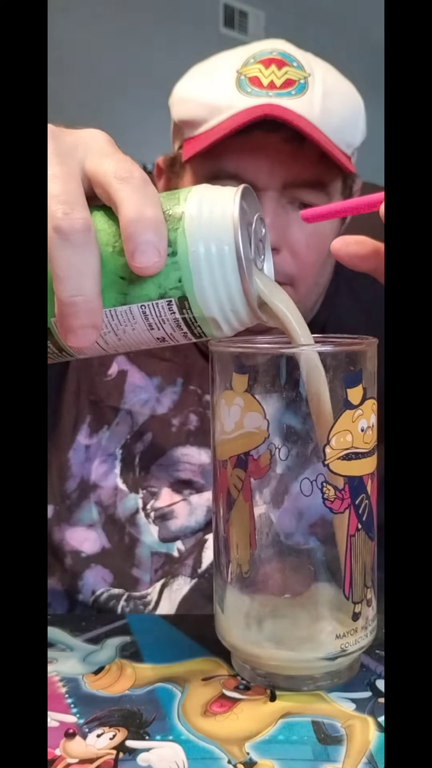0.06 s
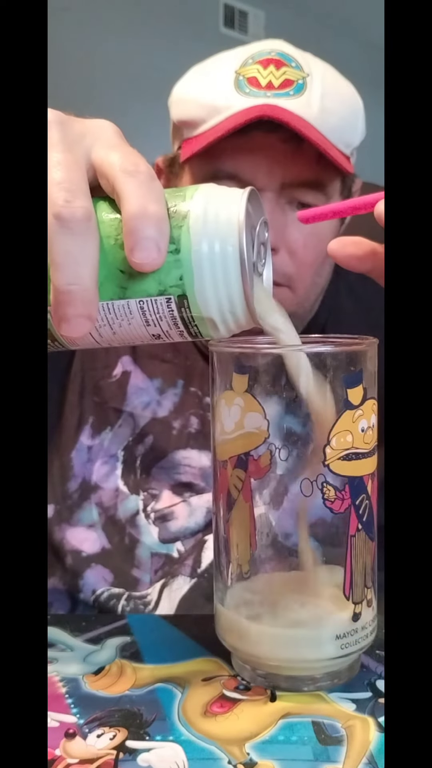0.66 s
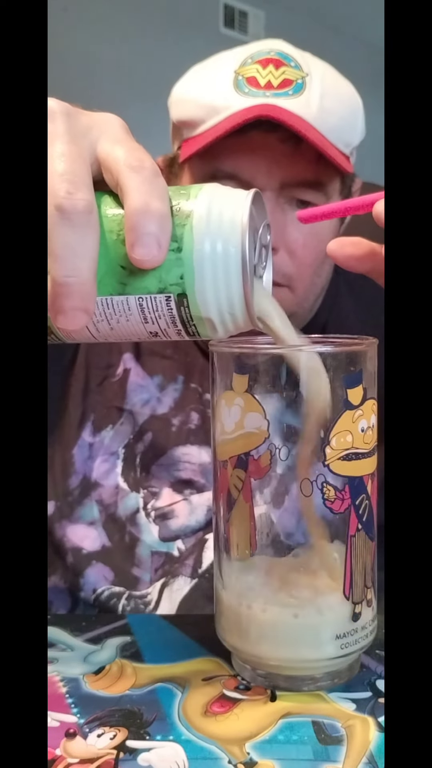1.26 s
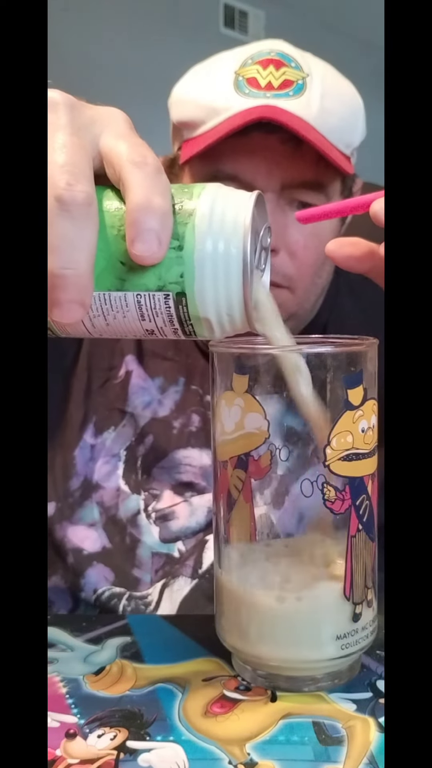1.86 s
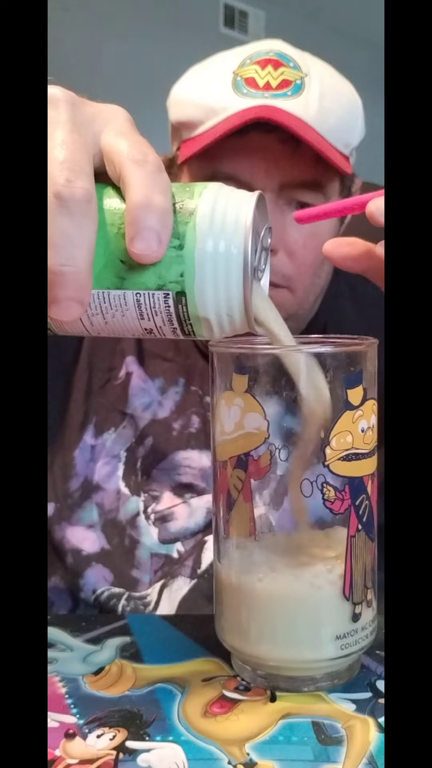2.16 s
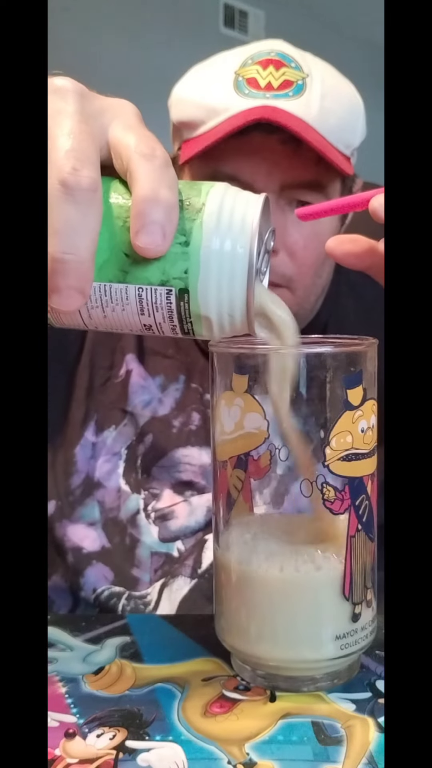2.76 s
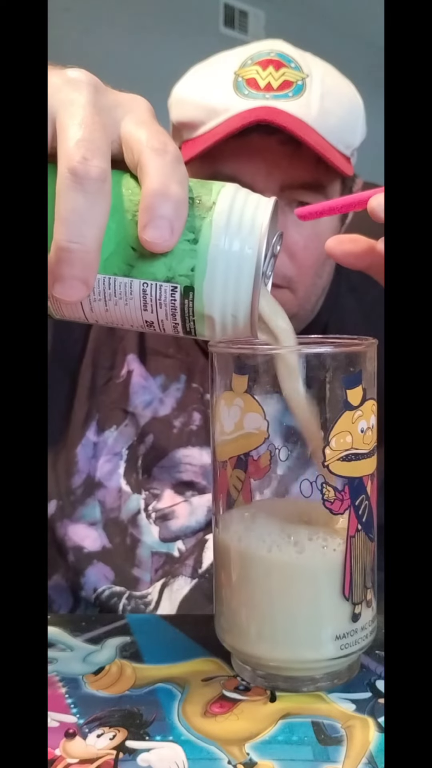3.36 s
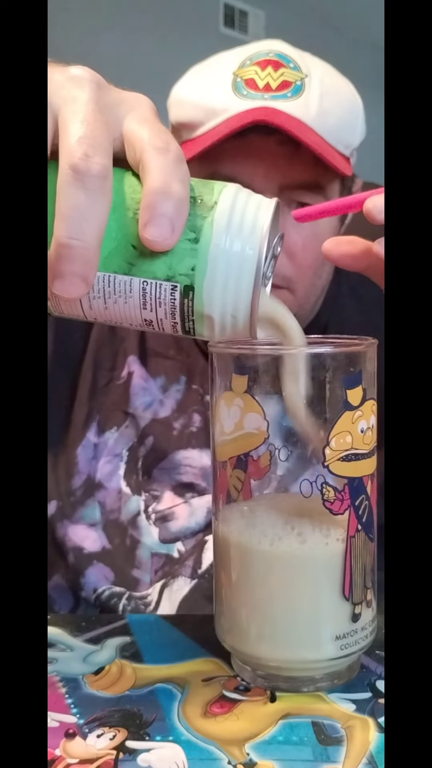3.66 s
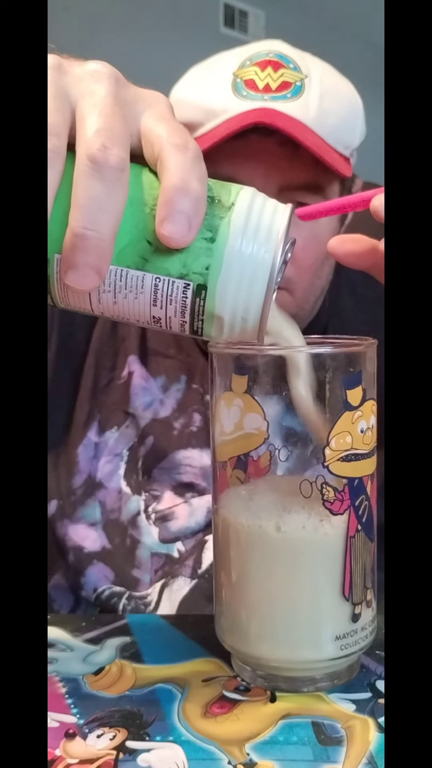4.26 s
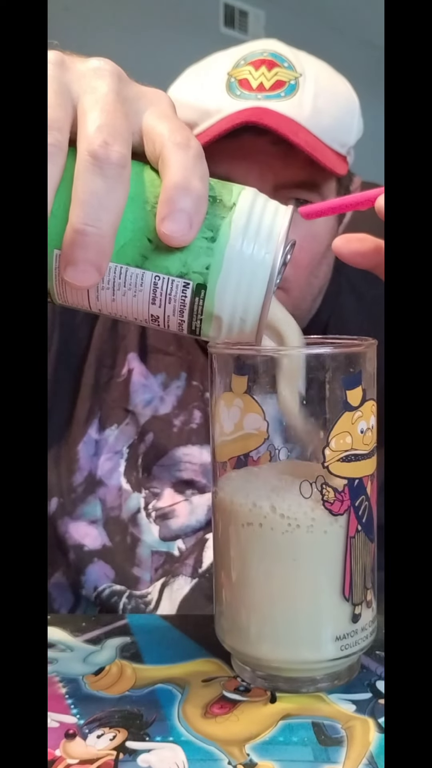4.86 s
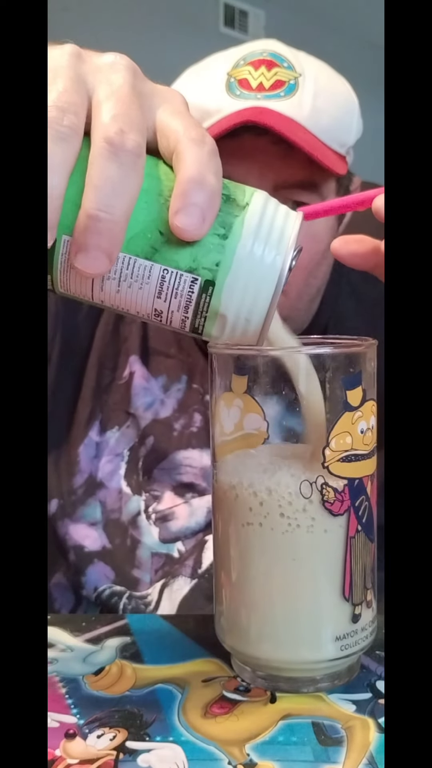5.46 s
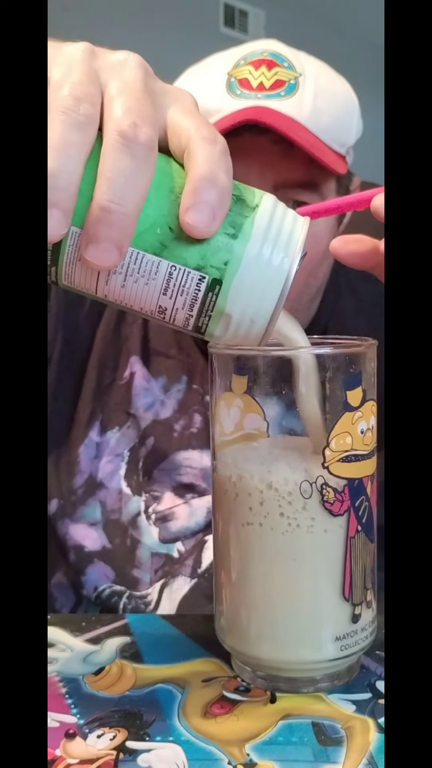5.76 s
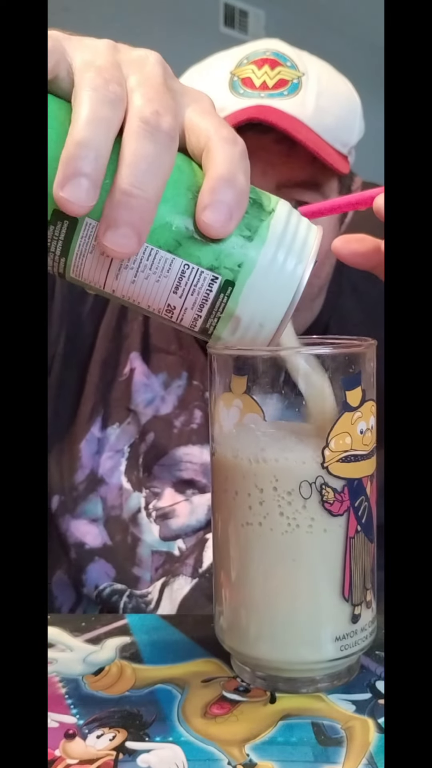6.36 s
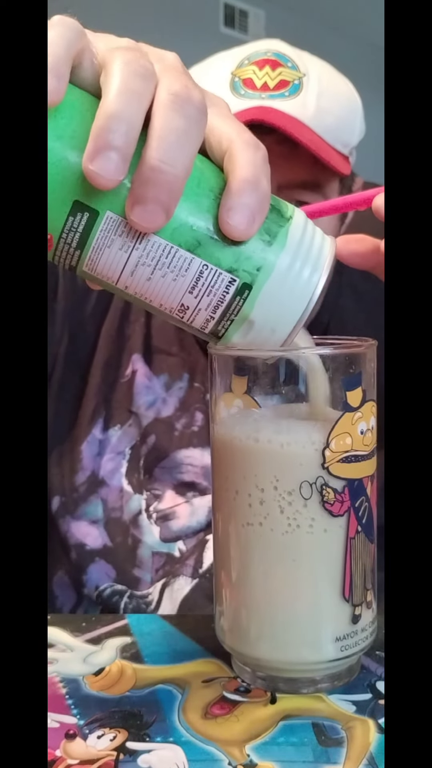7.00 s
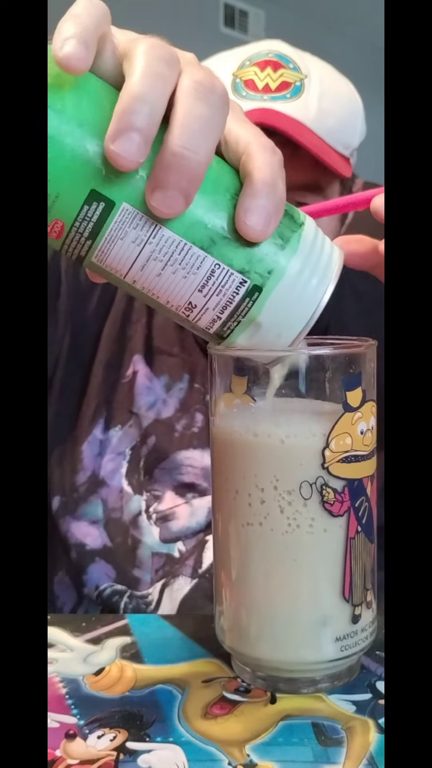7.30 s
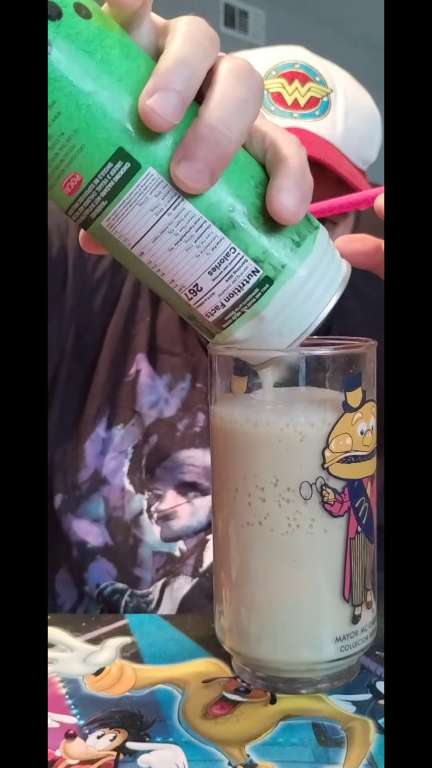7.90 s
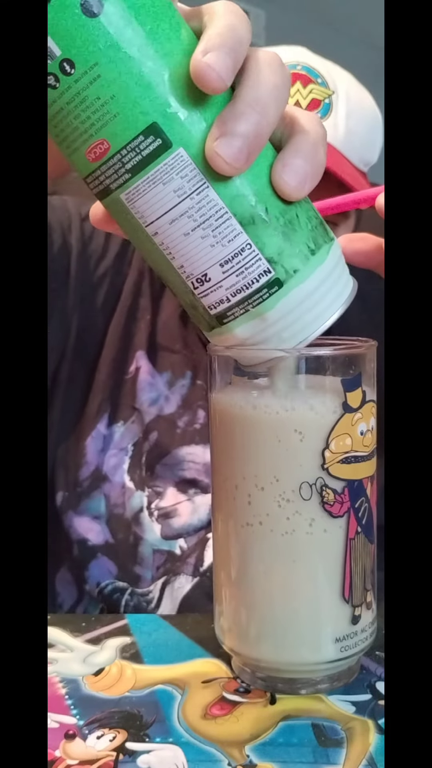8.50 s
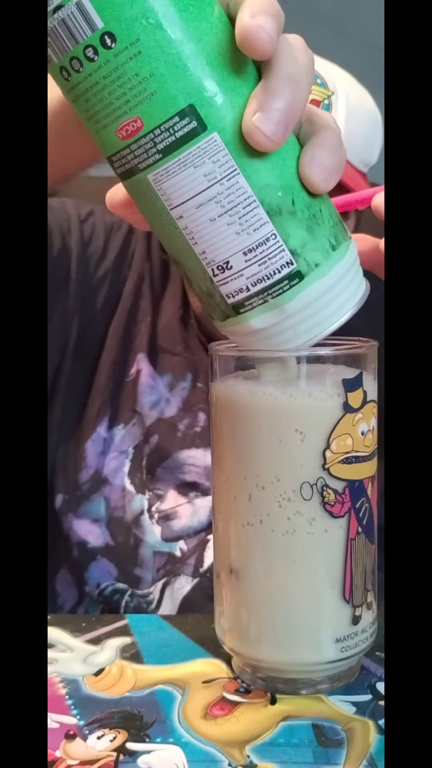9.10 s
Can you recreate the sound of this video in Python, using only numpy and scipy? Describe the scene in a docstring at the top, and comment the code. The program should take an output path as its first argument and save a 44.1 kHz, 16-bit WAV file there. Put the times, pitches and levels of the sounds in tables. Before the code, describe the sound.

A thick, foaming drink glugs and fizzes into a tall glass, rising in pitch, thinning to a trickle, then the can taps the rim.

```python
"""A thick, foaming drink is poured from a can into a tall glass, close to a phone in a small room.
The uneven stream traps big bubbles that glug in the air column above the liquid, whose pitch rises
as the glass fills. Small bubbles ping and spray crackles; the growing foam muffles the pour until
only a trickle is left. Near the end the can taps the rim. The room rumbles and hums faintly."""
import sys
import numpy as np
from scipy import signal
from scipy.fft import rfft, irfft, next_fast_len
from scipy.io import wavfile

SR = 44100
rng = np.random.default_rng(int(sys.argv[2]) if len(sys.argv) > 2 else 0)


def store_wav(level_fs):
    """Save 16-bit WAV to argv[1]."""
    pcm = np.round(np.clip(np.atleast_2d(level_fs), -1, 1) * 32767)
    wavfile.write(sys.argv[1], SR, pcm.T.astype(np.int16))


N = 403074
TOP_HZ = 15800


def amp(db):
    """Decibels to gain."""
    return 10 ** (np.asarray(db) / 20)


def unit(x):
    """Scale to rms 1."""
    return x / np.sqrt(np.mean(x ** 2) + 1e-20)


def along(points, hz):
    """(frequency [Hz], value) points read on a log axis."""
    knots_hz, values = np.transpose(points)
    return np.interp(np.log(hz + 1), np.log(knots_hz + 1), values)


def at(rows, time_s, column):
    """One column of a time table, read at time_s."""
    table = np.transpose(rows)
    return np.interp(time_s, table[0], table[column])


def curves(rows):
    """One value per sample for each column after the time."""
    return [at(rows, np.arange(N) / SR, column) for column in range(1, len(rows[0]))]


def wobble(rate_hz):
    """A random curve with rate_hz knots a second."""
    knots = rng.standard_normal(int(N * rate_hz / SR) + 2)
    return np.interp(np.arange(N) * rate_hz / SR, np.arange(len(knots)), knots)


def filtered(x, response):
    """x times a response of frequency."""
    size = next_fast_len(N + SR // 4)
    return irfft(rfft(x, size) * response(np.fft.rfftfreq(size, 1 / SR)), size)[..., :N]


def coloured(x, points):
    """x shaped by a (frequency [Hz], gain [dB]) spectrum."""
    return filtered(x, lambda hz: amp(along(points, hz)))


def add(track, time_s, sound):
    """Mix a sound into a track."""
    start = int(np.clip(round(time_s * SR), 0, N - 1))
    track[start:start + len(sound)] += sound[:N - start]


def resonate(x, hz, width_hz):
    """A resonance of gain 1 whose pitch may move."""
    angle = (2 * np.pi * (np.cumsum(hz) / SR % 1)).astype(np.float32)
    carrier = np.cos(angle) + 1j * np.sin(angle)
    pole = np.exp(-np.pi * width_hz / SR)
    return 2 * np.real(carrier * signal.lfilter([1 - pole], [1, -pole], x * carrier.conj()))


def patter(shape, grain):
    """Noise of countless droplets, spikier with more grain; rms 1."""
    return unit(rng.standard_normal(shape) * np.exp(grain * np.minimum(rng.standard_normal(shape), 2)))


def burst(t, t60_s, grain):
    """Grainy noise under a quick decay."""
    return patter(len(t), grain) * amp(-60 * t / t60_s)


def hum(centre_hz, width_hz):
    """A narrow noise band, heard as a wavering tone; rms 1."""
    return unit(filtered(rng.standard_normal(N), lambda hz: 1 / (1 + ((hz - centre_hz) / width_hz) ** 2)))


# Room air and rumble spectra: (frequency [Hz], gain [dB])
AIR_SPECTRUM = [(15, -39), (25, -53), (71, -13), (340, -3.5), (399, -5.5), (457, -10.5), (537, -6),
                (598, -17), (826, -21), (2420, -32), (2920, -21), (4040, -35.5), (9050, -31), (14300, -33),
                (15500, -60)]
RUMBLE_SPECTRUM = [(25, -37), (45, -24), (58, -0.5), (75, 0.5), (95, -1.5), (125, -5.5), (175, -9.5),
                   (300, -18.5), (600, -52)]
# Room bass: (time [s], rumble level [dB], drone level [dB])
BASS_LEVELS = [(0.0, -72.5, -76), (1.42, -61, -68), (4.18, -67.5, -80), (5.7, -66.5, -83), (5.98, -61, -68),
               (9.01, -62.5, -60), (9.14, -59.5, -81)]


def background(air_db=-67, rumble_trim_db=-1, drone_trim_db=-3, hum_db=-72):
    """Room air, a low rumble and drone that come and go, and a faint wavering hum."""
    mid, side = rng.standard_normal((2, N))
    side = coloured(side, [(200, -20.5), (600, -4), (2000, -2)])
    air = unit(coloured(np.array([mid + side, mid - side]), AIR_SPECTRUM))
    rumble_db, drone_db = curves(BASS_LEVELS)
    rumble = unit(coloured(rng.standard_normal(N) + 0.3 * rng.standard_normal((2, N)), RUMBLE_SPECTRUM))
    drone = amp(drone_db + drone_trim_db) * hum(centre_hz=145, width_hz=7.5)
    faint_hum = amp(hum_db) * hum(centre_hz=398, width_hz=6.5)
    return amp(air_db) * air + amp(rumble_db + rumble_trim_db) * rumble + drone + faint_hum


# Wall decay: (frequency [Hz], t60 [s])
WALL_DECAY = [(150, 0.056), (600, 0.17), (2500, 0.11), (6000, 0.084), (14000, 0.056)]


def room(x, walls_db=-9, near_db=-11, near_t60_s=0.13, onset_s=0.0025):
    """Nearby things echo at once, the walls with a short tail; both change as the splash moves about."""
    wet = np.zeros((2, N))
    block = SR // 2
    for start in range(0, N, block):
        hz, frame_s, noise = signal.stft(rng.standard_normal((2, SR // 4)), SR, nperseg=256)
        decay = amp(-60 * frame_s / along(WALL_DECAY, hz)[:, None])
        tails = signal.istft(noise * decay, SR, nperseg=256)[1]
        t = np.arange(tails.shape[1]) / SR
        tails *= 1 - np.exp(-t / onset_s)
        for port, tail in zip(wet, tails):
            near = burst(t, near_t60_s, grain=0.87)
            echoes = amp(walls_db) * tail / np.linalg.norm(tail)
            echoes += amp(near_db) * near / np.linalg.norm(near)
            add(port, start / SR, signal.fftconvolve(x[start:start + block], echoes))
    return wet


# Microphone port colour: (frequency [Hz], left minus right [dB])
PORT_BALANCE = [(200, -2), (420, -1), (650, -5), (820, -4.5), (1100, 1.5), (2400, 0), (3200, -3),
                (5600, -7.5), (7000, -1), (8400, 6.5), (10000, 25.5), (14000, 7)]


def port_gains(hz):
    """Left and right port gains at constant total power."""
    left = amp(along(PORT_BALANCE, hz))
    return np.array([left, np.ones_like(left)]) * np.sqrt(2 / (1 + left ** 2))


# Can on rim: (time [s], ring level [dB], tick level [dB])
RIM_TAPS = [(7.776, -64, -38), (8.108, -51, -67), (8.121, -41, -44.5)]
# Full glass: (frequency [Hz], level [dB], t60 [s])
GLASS_MODES = [(2950, -26.5, 5.0), (3612, -0.5, 0.17), (3840, -8, 0.31), (5943, -12.5, 0.19),
               (6100, -21, 1.3), (7391, -43, 5.0)]
# Contact tick: (frequency [Hz], gain [dB])
TICK_SPECTRUM = [(900, -3), (1900, 7.5), (3000, 10), (5200, 0.5), (7000, -12), (10000, -13), (15000, -36)]


def taps(ring_db=-3):
    """The can's lip touches the rim: a dry tick and a short ring of the full glass."""
    t = np.arange(SR // 4) / SR
    ring = sum(amp(db - 60 * t / t60_s) * np.sin(2 * np.pi * hz * t) for hz, db, t60_s in GLASS_MODES)
    rings, ticks = np.zeros((2, N))
    for time_s, db, tick_db in RIM_TAPS:
        add(rings, time_s, amp(db + ring_db) * ring)
        add(ticks, time_s, amp(tick_db) * burst(t, t60_s=0.014, grain=0.89))
    return rings + coloured(ticks, TICK_SPECTRUM)


# Foam head: (time [s], absorbed share of top treble [0-1])
FOAM_ABSORPTION = [(0, 0.19), (3, 0.46), (5.3, 0.19), (6.3, 0.85), (9.1, 1)]


def foam_head(x, edge_hz=10800):
    """The growing head of foam soaks up the highest treble."""
    share, = curves(FOAM_ABSORPTION)
    return x - share * filtered(x, lambda hz: 1 - 1 / (1 + (hz / edge_hz) ** 20))


# Main air resonance: (time [s], pitch [Hz])
COLUMN_PITCH = [(0, 640), (1.2, 643), (1.7, 635), (2.15, 630), (2.45, 662), (3, 752), (4, 826), (5, 944),
                (6, 1060), (7, 1192), (9.1, 1330)]
# Closed-pipe modes, strongest near odd multiples: (ratio to main pitch, width [Hz], gain [dB])
COLUMN_MODES = [(0.67, 94, -17), (1, 159, 8.5), (1.78, 260, -10), (3.05, 322, 2)]


def air_column(x):
    """The air in the glass rings at a pitch that rises as it fills."""
    pitch_hz, = curves(COLUMN_PITCH)
    return sum(amp(db) * resonate(x, ratio * pitch_hz, width_hz) for ratio, width_hz, db in COLUMN_MODES)


def tiny_bubbles(start_s, hz, gain, cycles, wander=0.86):
    """Damped rings; each bubble's random place sets its phase and strength at the two ports."""
    t = np.arange(SR // 250) / SR
    hz = np.clip(hz, 300, TOP_HZ)[:, None]
    rings = gain[:, None] * np.exp((2j * np.pi - 1 / cycles) * hz * t) * (1 - np.exp(-hz * t))
    index = (np.abs(start_s * SR).astype(int)[:, None] + np.arange(len(t))).ravel()
    place = wander * (rng.normal(size=hz.shape) * 1j + rng.normal(size=hz.shape) / 4)
    ports = [(rings * np.exp(side * place)).imag.ravel() for side in (1, -1)]
    return np.array([np.bincount(index, port, N)[:N] for port in ports])


def volleys(time_s, db, hz, t60_s, spread, cycles, linger=0.3, scatter_db=10.5):
    """A fading volley of 14 tiny bubbles per event, scattered around its pitch."""
    pitch_draw, size_draw, delay_draw = rng.standard_normal((len(time_s), 3, 14)).transpose(1, 2, 0)
    delay_s = linger * t60_s * delay_draw ** 2
    gain = amp(scatter_db * size_draw - 20 * delay_s / t60_s)
    gain = amp(db) * gain / np.linalg.norm(gain, axis=0)
    pitch_hz = hz * np.exp(spread * pitch_draw)
    return tiny_bubbles((time_s + delay_s).ravel(), pitch_hz.ravel(), gain.ravel(), cycles)


def strays(count, column, over_db, scatter_db=7, ceiling_db=-41):
    """Times and levels of faint, loosely spaced events that follow one column of POUR_LEVELS."""
    jitter, size = rng.uniform(-1.1, 1, (count, 2)).T
    time_s = np.clip((np.arange(count) + 0.5 + jitter) / count, 0, 1) * N / SR
    db = at(POUR_LEVELS, time_s, column) + over_db + scatter_db * size
    return time_s, np.minimum(db, ceiling_db)


# Loudest bursts of spray and breaking foam: (time [s], level [dB], pitch [Hz])
SPRAY_BURSTS = [(0.185, -46.5, 9160), (0.2624, -50, 8750), (0.702, -42.5, 9930), (0.767, -36.5, 9100),
                (0.7952, -34, 10800), (0.9347, -37, 9260), (1.0034, -44, 8900), (1.0435, -44, 8600),
                (1.1054, -45.5, 8500), (1.1742, -40, 8420), (1.248, -41.5, 9460), (1.3923, -27.5, 9530),
                (1.4994, -26.5, 7930), (1.5425, -32.5, 8760), (1.579, -36.5, 9820), (1.6307, -35, 9700),
                (1.6523, -29.5, 8400), (1.733, -26.5, 9900), (1.8234, -37, 8500), (1.934, -31.5, 9900),
                (2.0926, -32, 9340), (2.153, -38, 9200), (2.3856, -26, 10340), (2.4843, -34.5, 8750),
                (2.5186, -38, 9200), (2.6736, -37, 8500), (2.832, -28, 9200), (3.1315, -34, 9060),
                (3.358, -34.5, 9950), (3.57, -40, 9550), (3.681, -44, 9700), (3.8079, -38.5, 8700),
                (3.933, -37.5, 9800), (4.0639, -35.5, 8370), (4.403, -38, 8800), (4.5114, -31.5, 10400),
                (4.586, -40.5, 10700), (4.953, -41, 10700), (5.1267, -45.5, 9800), (5.1894, -39.5, 9200),
                (5.67, -45.5, 8940), (5.8397, -42, 9800), (5.9438, -33.5, 8870), (6.0826, -40, 9030),
                (6.3008, -44.5, 9300), (6.329, -40.5, 9300), (6.6308, -46, 9040), (6.7607, -46.5, 9350),
                (6.9663, -40.5, 8300), (7.0699, -41.5, 9400), (7.2552, -38.5, 8700), (7.432, -43, 8300)]
# Crackle: (frequency [Hz], gain [dB])
FIZZ_SPECTRUM = [(1500, -8), (3500, -3), (6000, -3.5), (7800, -5), (9300, 7.5), (10500, 1.5), (12000, 5),
                 (14500, -6), (16000, -19)]


def spray(crackle_db=6, patter_db=-10, tick_db=-1, tick_hz=11500, tick_lag_s=0.0035, faint_hz=9350):
    """Foam breaks: a volley of tiny bubbles, ticks of snapping films, then a patter of fine droplets."""
    faint = np.column_stack([*strays(70, BUBBLING, over_db=7.5), np.full(70, faint_hz)])
    time_s, db, hz = np.vstack([faint, SPRAY_BURSTS]).T
    t60_s = 0.044 * np.exp((db + 39) / 42)  # louder bursts last longer
    crackle = volleys(time_s, db + crackle_db, hz, t60_s, spread=0.228, cycles=10)
    ticks = volleys(time_s + tick_lag_s, db + tick_db, tick_hz, t60_s,
                    spread=0.2, cycles=1.3, linger=0.24, scatter_db=7)
    t = np.arange(SR // 6) / SR
    attack = 1 - np.exp(-t / 0.0036)
    for start_s, level_db, patter_t60_s in zip(time_s, db + patter_db, 2.67 * t60_s):
        for port in crackle:
            add(port, start_s, amp(level_db) * attack * burst(t, patter_t60_s, grain=0.8))
    return coloured(crackle, FIZZ_SPECTRUM) + ticks


def surges(depth_db=7, fade_s=0.029, lull_db=-3):
    """The uneven stream swells with each loud burst of spray and sinks between them."""
    t = np.arange(N) / SR
    starts_s = np.concatenate([[-1], np.sort(np.transpose(SPRAY_BURSTS)[0])])
    since_s = t - starts_s[np.searchsorted(starts_s, t) - 1]
    return amp(lull_db + depth_db * np.exp(-since_s / fade_s))


def bubble_cloud(count=6500, centre_hz=4100, spread=0.531, scatter_db=3):
    """Tiny bubbles of random size and pitch ring at random times; rms 1."""
    hz = centre_hz * np.exp(spread * rng.standard_normal(count))
    gain = amp(scatter_db * np.minimum(rng.exponential(size=count), 4))
    return unit(tiny_bubbles(rng.uniform(0, N / SR, count), hz, gain, cycles=5))


# Steady pour: (time [s], churn level [dB], bubbling level [dB])
POUR_LEVELS = [(0.0, -75, -66.5), (0.73, -80, -64), (0.89, -75, -46), (1.25, -48.5, -55.5),
               (1.7, -49, -47.5), (1.91, -53, -52.5), (2.44, -50.5, -56.5), (3.0, -55.5, -60),
               (3.36, -53, -63.5), (3.77, -64, -65), (3.94, -55, -59), (4.12, -57.5, -67.5),
               (5.09, -60, -66), (6.39, -61.5, -67), (8.68, -78, -81), (9.14, -86, -81.5)]
CHURN, BUBBLING = 1, 2  # its columns
# Bubbling: (frequency [Hz], gain [dB])
BUBBLE_SPECTRUM = [(900, -23), (1500, -5.5), (1900, 4.5), (2500, 0), (4000, -0.5), (5500, 7), (7000, 4.5),
                   (9000, -21), (15000, -15)]


def stream(churn_trim_db=-1, cloud_db=1.5, wash_db=-5, foam_db=-7, flutter_db=3.5):
    """The stream churns the glass and keeps a cloud of bubbles and foam going."""
    churn_db, bubbling_db = curves(POUR_LEVELS)
    churn = amp(churn_db + churn_trim_db) * unit(air_column(patter(N, grain=2.15)))
    cloud = amp(cloud_db) * unit(coloured(bubble_cloud(), BUBBLE_SPECTRUM))
    wash = amp(wash_db) * unit(coloured(patter((2, N), grain=0.99), BUBBLE_SPECTRUM))
    foam_spectrum = [(4000, -41), (7800, -0.5), (9400, 6.5), (11500, -4), (15500, -54)]
    foam = amp(foam_db) * unit(coloured(patter((2, N), grain=6.1), foam_spectrum))
    pour = churn + amp(bubbling_db) * (cloud + wash + foam)
    return amp(flutter_db * wobble(rate_hz=35)) * surges() * pour


def small_pings(low_hz=1804, high_hz=6220, t60_s=0.016):
    """Fainter drops of any size fall all through the pour; rows as in CLEAR_PINGS."""
    time_s, db = strays(120, BUBBLING, over_db=8)
    hz = np.exp(rng.uniform(np.log(low_hz), np.log(high_hz), len(db)))
    return np.column_stack([time_s, db, hz, np.full(len(db), t60_s)])


# Clearest small bubbles and drops: (time [s], level [dB], pitch [Hz], t60 [s])
CLEAR_PINGS = [(0.1219, -45, 2280, 0.025), (0.4386, -47.5, 3240, 0.056), (0.715, -27, 5380, 0.0089),
               (0.767, -24.5, 4860, 0.042), (0.7977, -29, 5070, 0.026), (0.8714, -38.5, 6870, 0.023),
               (0.938, -32, 6150, 0.015), (1.044, -28, 5490, 0.016), (1.284, -33, 5700, 0.018),
               (1.332, -31, 1870, 0.025), (1.3848, -31.5, 2030, 0.019), (1.4097, -26.5, 2320, 0.015),
               (1.499, -26.5, 1900, 0.018), (1.5776, -36, 5900, 0.025), (1.6646, -34.5, 2002, 0.044),
               (1.7335, -33, 2070, 0.025), (1.933, -34, 6140, 0.023), (2.0829, -37.5, 2070, 0.025),
               (2.163, -30, 4540, 0.025), (2.4862, -40, 2050, 0.035), (3.1272, -34, 4850, 0.021),
               (3.5424, -39.5, 2450, 0.019), (3.741, -39, 6080, 0.025), (3.935, -42.5, 2580, 0.036),
               (4.042, -42, 2310, 0.025), (4.7385, -38.5, 2950, 0.021), (5.002, -42, 2240, 0.038),
               (5.2877, -42, 5800, 0.018), (5.3168, -42.5, 6070, 0.025), (5.9868, -43.5, 2600, 0.029),
               (6.27, -44.5, 6560, 0.014), (6.3275, -42, 5340, 0.036), (6.4514, -45.5, 3150, 0.032),
               (6.6713, -40.5, 5570, 0.034), (6.9641, -41, 5600, 0.066), (7.255, -54, 5950, 0.025),
               (7.396, -48.5, 2740, 0.04), (7.431, -48, 7290, 0.025), (7.6326, -48.5, 6150, 0.0092),
               (8.2172, -51, 3000, 0.032), (8.5096, -56.5, 6340, 0.019)]


def pings(ring_db=5, satellite_db=-3, snap_db=-14, column_db=-6, attack_cycles=2):
    """A bubble pinches off with a snap that stirs the air column, rings upward and sheds smaller ones."""
    t = np.arange(SR // 12) / SR
    rings, snaps = np.zeros(N), np.zeros((2, N))
    drops = np.vstack([small_pings(), CLEAR_PINGS])
    for time_s, db, hz, t60_s in drops:
        glide_per_s = rng.normal(4.3, 1.2)
        phase = 2 * np.pi * hz * t * (1 + glide_per_s * t / 2)
        envelope = (1 - np.exp(-t * hz / attack_cycles)) * amp(-60 * t / t60_s)
        add(rings, time_s, amp(db + ring_db) * envelope * np.sin(phase))
        for port in snaps:
            add(port, time_s, amp(db + snap_db) * burst(t, t60_s=0.063, grain=1))
    time_s, db, hz, t60_s = drops.T
    satellites = volleys(time_s, db + satellite_db, hz * 1.076, t60_s, spread=0.17, cycles=13.4)
    column = amp(column_db) * air_column(snaps[0])
    return rings + satellites + 2 * coloured(snaps, BUBBLE_SPECTRUM) + column


# Low resonances: (frequency [Hz], width [Hz], gain [dB])
HOLLOW_MODES = [(423, 63, 6.5), (501, 146, -1.5)]


def sloshing(x):
    """Sloshing stirs low, hollow resonances, most strongly in the half-full glass."""
    def response(hz):
        modes = sum((-1) ** k * amp(db) * 1j * hz * width / (centre ** 2 - hz ** 2 + 1j * hz * width)
                    for k, (centre, width, db) in enumerate(HOLLOW_MODES))
        return modes * amp(along([(250, 6), (380, 6.5)], hz))
    depth_db, = curves([(1.6, -18), (2, -2.5), (4.5, -5.5), (6, -23)])
    return filtered(amp(depth_db) * x, response)


# Splash heard directly: (frequency [Hz], gain [dB])
SLAP_SPECTRUM = [(300, -58), (520, -4), (700, 11), (1100, -1.5), (1500, -16), (2400, 0), (3300, -12),
                 (6000, -43)]


def slapping(x):
    """Slaps on the surface get out more freely as it nears the rim."""
    rim_db, = curves([(1, -12), (3, 5), (5, 6.5), (6.5, 5.5)])
    return amp(rim_db) * coloured(x, SLAP_SPECTRUM)


def small_glugs(spread=0.1, splash_db=-12, slosh_db=-9):
    """Lesser bubbles gurgle near the air column's pitch; rows as in BIG_GLUGS, from its first on."""
    time_s, db = strays(130, CHURN, over_db=7)
    hz = at(COLUMN_PITCH, time_s, column=1) * np.exp(spread * rng.standard_normal(len(db)))
    return np.column_stack([time_s, db, hz, db + splash_db, db + slosh_db])[time_s > BIG_GLUGS[0][0]]


# Glug envelope, curter as the drink deepens: (time [s], typical rise [s], roundness exponent)
GLUG_SHAPE = [(1.25, 0.006, 1.75), (1.7, 0.0044, 1.37), (2, 0.0026, 0.83), (3.4, 0.0037, 0.85),
              (4.5, 0.0022, 0.83), (7, 0.0023, 0.83)]
# Loudest trapped bubbles: (time [s], ring level [dB], pitch [Hz], splash level [dB], slosh level [dB])
BIG_GLUGS = [(0.811, -35.5, 617, -37.5, -55), (0.886, -42.5, 617, -45, -62), (0.936, -49, 610, -39, -57),
             (1.038, -26.5, 627, -46, -56), (1.061, -25.5, 624, -68, -48), (1.134, -19, 638, -34, -53),
             (1.158, -22.5, 611, -39.5, -54), (1.198, -23.5, 588, -42, -36), (1.228, -27.5, 635, -50, -56),
             (1.258, -24.5, 630, -55, -42), (1.29, -24.5, 592, -59, -31), (1.323, -31.5, 726, -47, -55),
             (1.386, -25.5, 620, -38.5, -55), (1.406, -30.5, 524, -39, -56), (1.498, -31.5, 644, -55, -49),
             (1.528, -23, 639, -36, -45), (1.543, -23, 646, -43, -36), (1.602, -21, 652, -63, -55),
             (1.631, -15.5, 667, -37, -44), (1.665, -29, 583, -51, -56), (1.727, -21.5, 665, -37, -55),
             (1.76, -31, 538, -38.5, -38), (1.818, -22.5, 644, -38.5, -40), (1.844, -28.5, 679, -41.5, -38),
             (1.956, -30.5, 673, -48, -37.5), (1.972, -24, 672, -42.5, -38.5), (2.083, -32, 587, -41, -59),
             (2.116, -30, 579, -45, -53), (2.155, -26.5, 664, -63, -49), (2.191, -35, 670, -47, -44.5),
             (2.257, -25, 670, -42, -45.5), (2.378, -40, 486, -43.5, -47), (2.415, -27, 747, -38.5, -60),
             (2.433, -27, 734, -46, -49), (2.488, -29, 745, -50, -42), (2.512, -22.5, 738, -53, -36),
             (2.673, -37, 733, -52, -53), (2.794, -25.5, 717, -42, -35.5), (2.828, -33.5, 748, -39.5, -46),
             (3.015, -31.5, 760, -45.5, -48), (3.127, -29.5, 791, -42.5, -39),
             (3.31, -31.5, 783, -47.5, -58), (3.359, -41, 910, -48, -58), (3.544, -34.5, 804, -48, -45),
             (3.573, -51, 780, -46, -57), (3.738, -46, 945, -47.5, -51.5), (3.812, -36.5, 826, -46, -47),
             (3.929, -33.5, 840, -52, -45), (3.941, -30.5, 814, -44.5, -49), (4.063, -39.5, 842, -48, -50),
             (4.254, -32.5, 842, -60, -62), (4.405, -36.5, 826, -47.5, -71), (4.533, -29.5, 890, -46, -59),
             (4.589, -37, 820, -66, -56), (4.64, -40.5, 890, -72, -43), (4.81, -38.5, 915, -53.5, -61),
             (4.893, -45, 930, -57, -65), (5.038, -32.5, 926, -47, -48.5), (5.129, -41.5, 950, -53, -52),
             (5.294, -31.5, 924, -56, -48.5), (5.671, -44.5, 993, -64, -70), (5.833, -36, 1160, -51, -41),
             (5.929, -42, 1070, -60, -51), (5.957, -38, 965, -50.5, -50), (6.328, -42.5, 1120, -55.5, -48),
             (6.439, -41, 1126, -69, -64), (6.501, -42, 1200, -50, -59), (6.851, -42, 1230, -53.5, -63),
             (8.194, -53, 1220, -65, -68)]


def glugs(ring_trim_db=-1, splash_trim_db=9, slap_trim_db=8, slosh_trim_db=16):
    """Big bubbles pulled under swell and die; each splash slaps, sloshes and rings the air column."""
    t = np.arange(SR // 8) / SR
    rings, splashes, slaps, sloshes = np.zeros((4, N))
    for time_s, ring_db, hz, splash_db, slosh_db in np.vstack([small_glugs(), BIG_GLUGS]):
        rise_s = at(GLUG_SHAPE, time_s, column=1) * np.exp(0.23 * rng.normal())
        roundness = at(GLUG_SHAPE, time_s, column=2)
        envelope = (t / rise_s * np.exp(1 - t / rise_s)) ** roundness
        glide_per_s = rng.normal(2, 4)  # the pitch mostly lifts as a bubble nears the surface
        phase = 2 * np.pi * hz * t * (1 + glide_per_s * (t / 2 - rise_s))
        add(rings, time_s, amp(ring_db + ring_trim_db) * envelope * np.sin(phase))
        add(splashes, time_s, amp(splash_db + splash_trim_db) * burst(t, t60_s=0.064, grain=0.13))
        add(slaps, time_s, amp(splash_db + slap_trim_db) * burst(t, t60_s=0.049, grain=0.13))
        add(sloshes, time_s, amp(slosh_db + slosh_trim_db) * burst(t, t60_s=0.13, grain=0.67))
    return rings + air_column(splashes) + slapping(slaps) + sloshing(sloshes)


def scene(left_lead_s=0.00013):
    """The pour reaches the left port slightly first; each port colours it in its own way."""
    pour = glugs() + pings() + taps() + foam_head(spray() + stream())
    advance_s = np.array([[0.5], [-0.5]]) * left_lead_s
    direct = filtered(pour, lambda hz: np.exp(2j * np.pi * hz * advance_s))
    return filtered(direct + room(pour[0]), port_gains) + background()


def record(dry):
    """The phone keeps nothing above its band limit."""
    return filtered(dry, lambda hz: hz < TOP_HZ)


dry = scene()
out = record(dry)
store_wav(out)
```